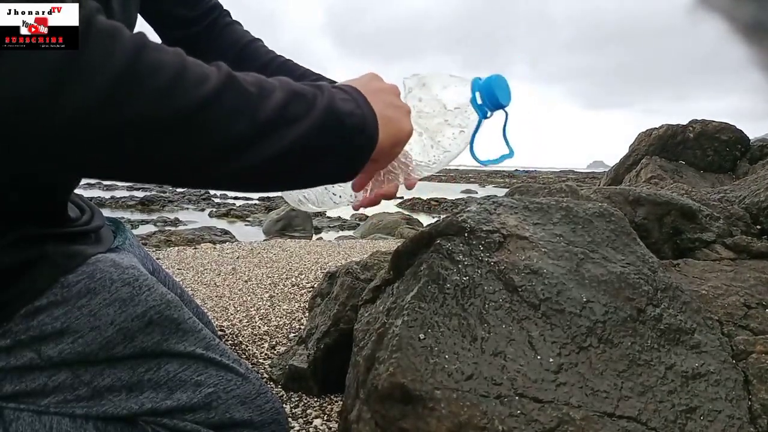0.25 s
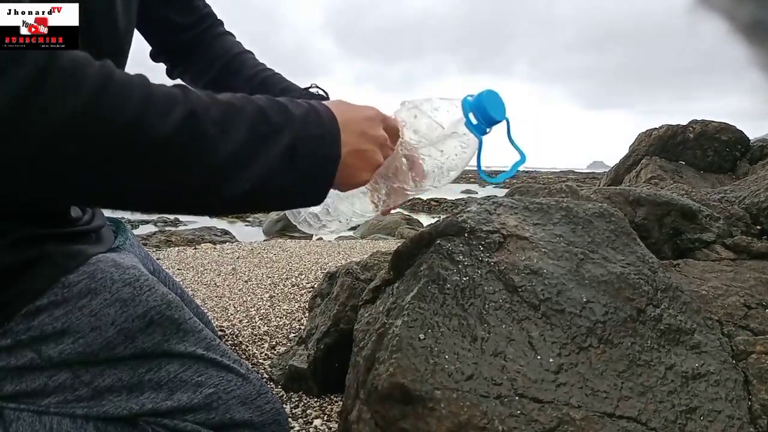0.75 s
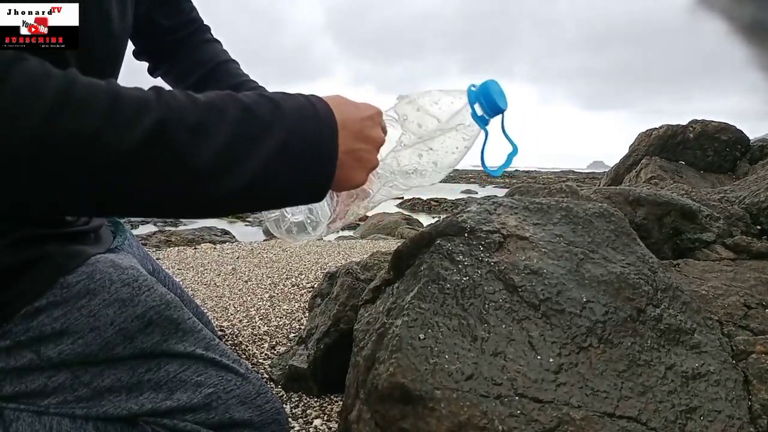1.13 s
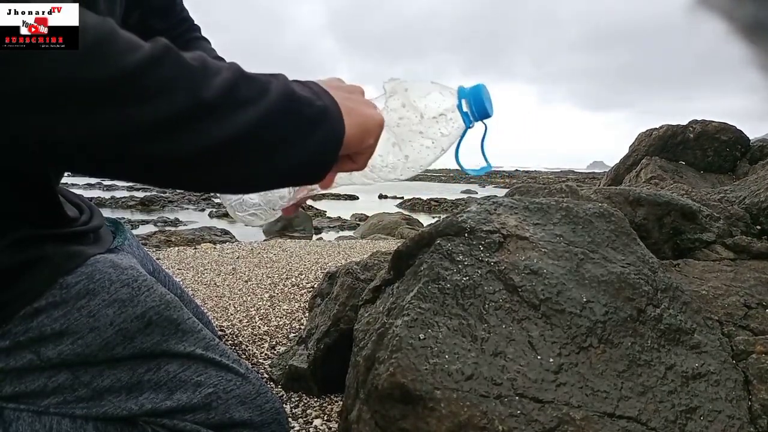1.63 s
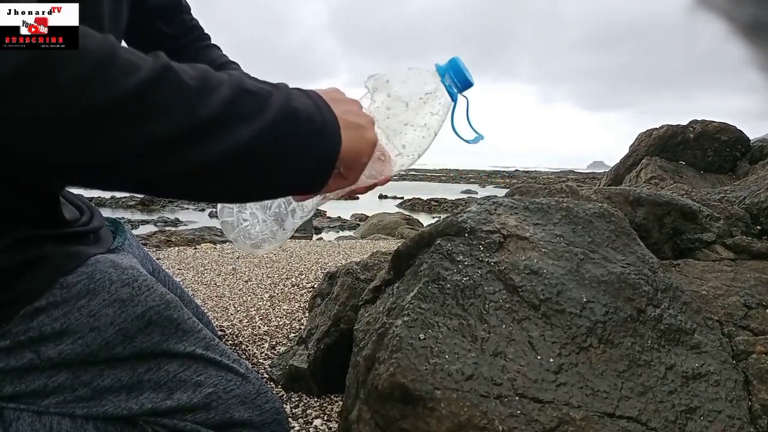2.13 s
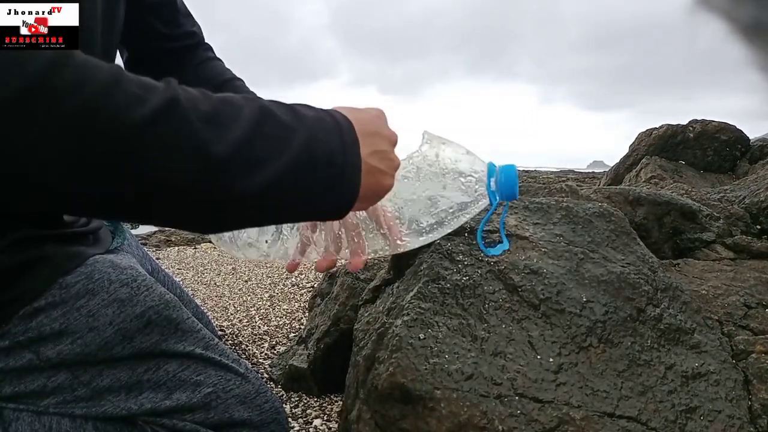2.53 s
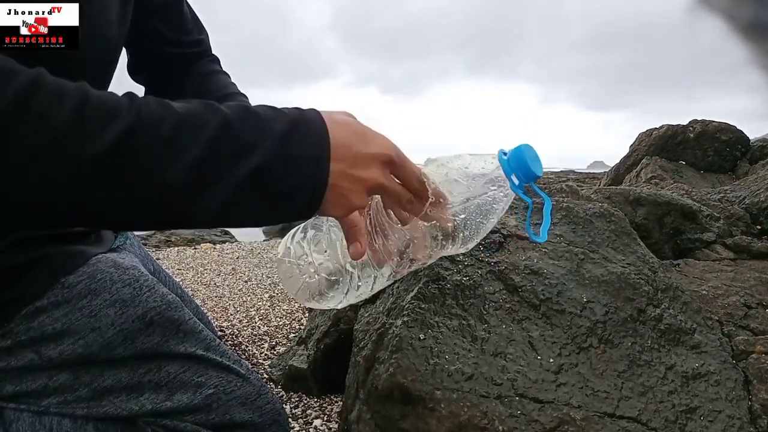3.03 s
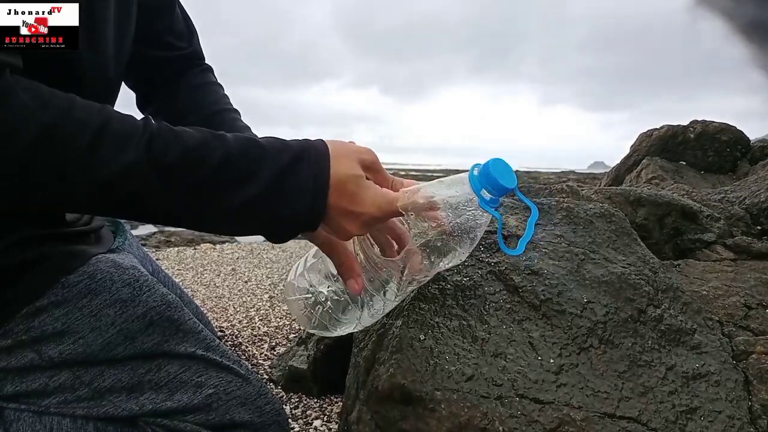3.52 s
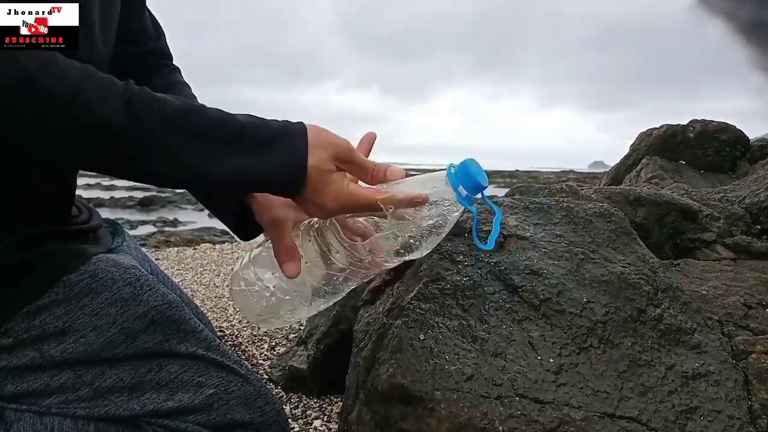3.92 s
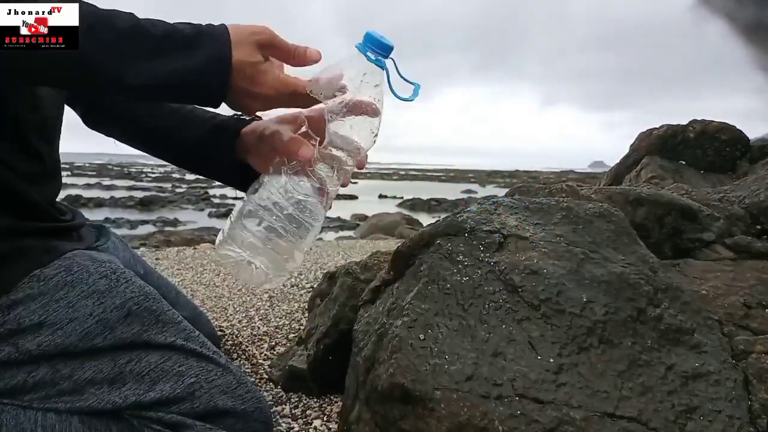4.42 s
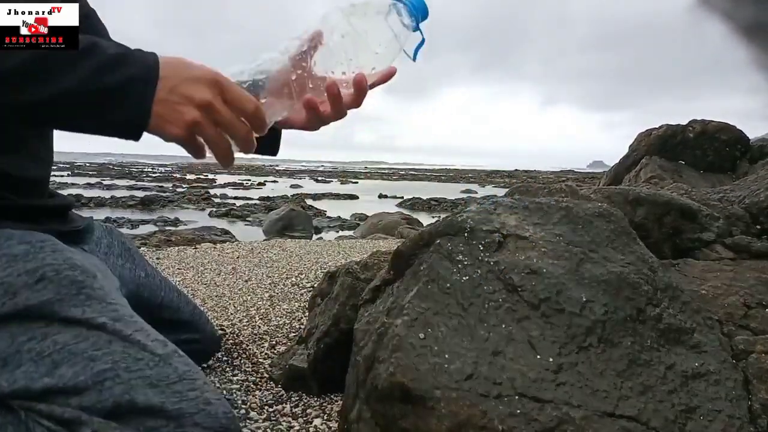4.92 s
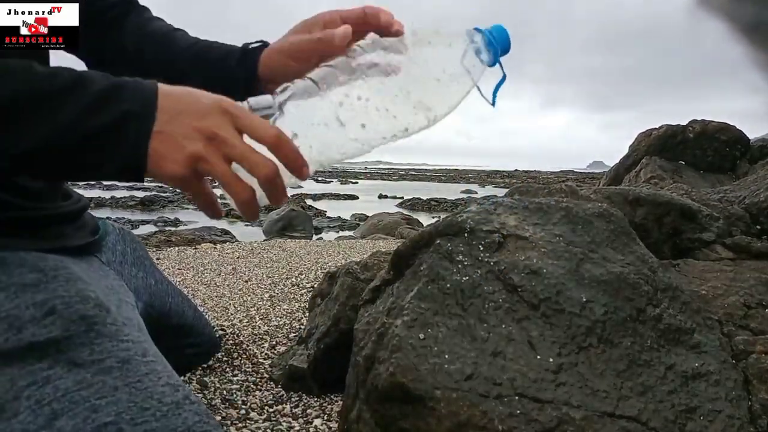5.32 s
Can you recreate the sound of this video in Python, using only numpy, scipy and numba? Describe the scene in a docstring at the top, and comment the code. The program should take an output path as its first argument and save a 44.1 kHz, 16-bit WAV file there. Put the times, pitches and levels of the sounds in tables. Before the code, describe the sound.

An empty plastic bottle is squeezed and twisted close to the microphone on an open rocky shore. From the start, small bright clicks and snaps come in irregular groups, with a tight cluster near 0.5 s and strong pops around 0.9 s. Lighter ticks follow at 1.2 s, then a hard double crack near 1.8 s. Crackling thickens from 2.2 s into the loudest burst at about 2.5 s, briefly pushing the background down. From 2.8 to 3.5 s it is sparser, with soft skin rubs and a barely audible squeak. A solid pop lands at 3.65 s, hollow low booms swell around 3.85 to 4.1 s, and a loud snap hits near 4.4 s. A short rub and squeak at 4.65 s leads to a lull, then boomy pops, scrapes and crackles from 5.05 s to the end. Gusting low wind and faint distant surf continue throughout.

```python
"""Sharp plastic snaps, rubs and hollow booms: two hands squeeze and twist an empty bottle on a rocky shore.
Dents in the thin wall buckle, ringing ribs and panels and pumping the air inside; skin sticks and slips.
Gusting wind rumbles and rushes over the hiss of far surf, and the rocks scatter a faint answer.
A limiter ducks everything during the hardest snaps and for a moment after them."""
import sys
import numpy as np
from scipy import signal
from scipy.fft import rfft, irfft, next_fast_len
from scipy.io import wavfile
from scipy.ndimage import uniform_filter1d, minimum_filter1d, map_coordinates
from numba import njit

SR = 44100
rng = np.random.default_rng(int(sys.argv[2]) if len(sys.argv) > 2 else 0)


def store_pcm(level_fs):
    """Save levels as 16-bit WAV."""
    pcm = np.round(np.clip(level_fs, -1, 1) * 32767).astype(np.int16)
    wavfile.write(sys.argv[1], SR, np.atleast_2d(pcm).T)


N = 245195  # length in samples

# colour of the thin hiss, in skin friction and in the faint background: frequency_hz, relative_level_db
HISS_COLOUR = [(3000, -16), (5000, -1.5), (6500, -9), (8100, 3.5), (10000, -14), (13000, -13), (15200, -5)]


def amp(db):
    """Level law: decibels to amplitude gain."""
    return 10 ** (np.asarray(db) / 20)


def unit(x):
    """Power normalisation: scale to rms 1."""
    return x / np.sqrt(np.mean(x ** 2) + 1e-20)


def unit_energy(x):
    """Energy normalisation: give each row the energy of 10 ms at rms 1."""
    energy = np.sum(x ** 2, -1, keepdims=True) / (SR * .01)
    return x / np.sqrt(energy + 1e-20)


def along(points, hz):
    """Interpolation of (frequency_hz, value) points along a logarithmic frequency axis."""
    f, v = np.transpose(points)
    return np.interp(np.log(hz + 1), np.log(f), v)


def colour(x, points):
    """Minimum-phase filtering: the log magnitude, folded in the cepstrum, fixes a causal response."""
    n = x.shape[-1]
    m = 2 * next_fast_len(n // 2 + 1024)
    # fall to -80 dB an octave outside the given points
    closed = [(points[0][0] / 2, -80), *points, (points[-1][0] * 2, -80)]
    log_gain = np.log(amp(along(closed, np.fft.rfftfreq(m, 1 / SR))))
    cepstrum = irfft(log_gain)
    cepstrum[1:m // 2] *= 2
    cepstrum[m // 2 + 1:] = 0
    response = np.exp(rfft(cepstrum))
    return irfft(rfft(x, m) * response, m)[..., :n]


def wobble(rate):
    """Slow random modulation: a smooth curve through normal deviates, rate knots a second."""
    knots = rng.standard_normal(int(N * rate / SR) + 4)
    return map_coordinates(knots, [np.arange(N) * rate / SR])


def noise(points):
    """Broadband excitation: coloured noise of rms 1."""
    return unit(colour(rng.standard_normal(N), points))


def tone(hz, waver, rate):
    """Frequency modulation: a sine of rms 1 whose pitch wanders by the relative depth waver."""
    pitch_hz = hz * (1 + waver * wobble(rate))
    return unit(np.sin(2 * np.pi * np.cumsum(pitch_hz) / SR))


def swell(middle, half_width):
    """Gaussian envelope, down to exp(-2) of its peak at half_width seconds from the middle."""
    return np.exp(-2 * ((np.arange(N) / SR - middle) / half_width) ** 2)


def dying(t, t60, attack):
    """Damped response: quick rise, then exponential decay by 60 dB in t60 seconds."""
    return amp(-60 * t / t60) * (1 - np.exp(-t / attack))


def wind():
    """Turbulence: a low rumble follows the wind strength fully, a higher rush only in part."""
    # wind strength, of which only the departure from its mean counts: time_s, strength_db
    gusts = [(0, -32), (0.6, -36), (1.0, -33), (1.8, -35.5), (2.2, -34), (2.4, -39), (2.9, -29.5),
             (3.2, -33.5), (3.45, -30.5), (4.0, -30.5), (4.2, -36.5), (4.55, -29.5), (5.2, -37.5),
             (5.4, -30.5), (5.56, -37)]
    # colours of the rumble and the rush: frequency_hz, relative_level_db
    rumble_colour = [(20, -42), (33, -33), (50, -8), (75, -2), (130, 2.5), (200, -2), (280, -11),
                     (450, -28.5)]
    rush_colour = [(120, -16.5), (230, 4), (350, 0), (500, -4.5), (700, -10), (1000, -22), (1600, -32)]
    rumble_db, rush_db, rush_follows = -33.7, -33.8, 0.3  # base levels; rush dB per gust dB
    strength_db = np.interp(np.arange(N) / SR, *np.transpose(gusts))
    gust_db = strength_db - strength_db.mean()
    rumble = amp(rumble_db + gust_db + 2.9 * wobble(26)) * noise(rumble_colour)
    rush = amp(rush_db + rush_follows * gust_db + 1.3 * wobble(16)) * noise(rush_colour)
    return rumble + rush


def surf():
    """Many distant sources merge into smooth noise, over a much fainter steady hiss."""
    # colour of far surf: frequency_hz, relative_level_db
    surf_colour = [(400, -15.5), (900, 7), (1500, 1.5), (2200, -0.5), (3300, -2), (4200, -9.5),
                   (5200, -21.5), (6500, -26.5), (8200, -24), (10000, -35), (15000, -40)]
    waves = amp(-49.5 + 0.14 * wobble(2.1)) * noise(surf_colour)
    return waves + amp(-75) * noise(HISS_COLOUR)


def rocks(x):
    """Diffuse scattering: boulders and pebbles answer 3 ms later with a short decaying noise tail."""
    # decay time of the scattered sound: frequency_hz, t60_s
    decay = [(200, 0.051), (2000, 0.047), (8000, 0.043), (15000, 0.042)]
    hz, t, z = signal.stft(rng.standard_normal(SR // 5), SR, nperseg=128)
    fading = z * amp(-60 * t / along(decay, hz)[:, None])
    tail = signal.istft(fading, SR, nperseg=128)[1]
    delay = np.zeros(round(.003 * SR))
    return signal.fftconvolve(x, np.concatenate([delay, tail / np.linalg.norm(tail)]))[:N]


def squeaks():
    """Stick-slip oscillation: skin on the wall locks briefly into a faint, thin, unsteady tone."""
    # middle_s, pitch_hz, level_db
    chirps = [(3.262, 1750, -40), (4.665, 1380, -33)]
    return sum(amp(db) * swell(s, 0.016) * tone(hz, waver=0.07, rate=450) for s, hz, db in chirps)


def slides():
    """Stick-slip friction: an irregular grip modulates the scrape and hiss of skin on the wall."""
    # fingers sliding: middle_s, half_width_s, scrape_level_db
    strokes = [(0.283, 0.089, -50.5), (1.06, 0.045, -47), (3.135, 0.08, -51), (3.305, 0.03, -45.5),
               (3.835, 0.047, -42), (4.027, .08, -52), (4.672, 0.038, -35), (4.88, 0.53, -53.5),
               (5.29, 0.025, -35), (5.348, 0.062, -35), (5.507, 0.058, -48)]
    # colour of the scrape: frequency_hz, relative_level_db
    scrape_colour = [(600, -7), (1000, -0.5), (1500, 3.5), (2300, -4.5), (3100, -2), (4500, -16.5),
                     (7000, -36)]
    hiss_db, hiss_grows = -31, 0.66  # the hiss gains less than a dB per dB of scrape
    scrape = sum(amp(db) * swell(s, width) for s, width, db in strokes)
    hiss = sum(amp(hiss_db + hiss_grows * db) * swell(s, width) for s, width, db in strokes)
    grip = unit(amp(4.2 * wobble(500) + 1.5 * wobble(90)))
    return grip * (scrape * noise(scrape_colour) + hiss * noise(HISS_COLOUR))


def booms():
    """Cavity resonance: the hollow bottle booms briefly, as the grip shifts or after a snap."""
    # middle_s, pitch_hz, level_db
    hollow_booms = [(2.832, 112, -26), (3.842, 156, -15), (3.896, 127, -23), (3.95, 55, -31),
                    (3.94, 119, -26), (3.983, 174, -22.5), (3.988, 94, -21.5), (4.076, 149, -23),
                    (4.138, 570, -23.5), (4.63, 125, -24.5), (5.058, 202, -24), (5.113, 228, -21)]
    return sum(amp(db) * swell(s, 0.021) * tone(hz, waver=0.062, rate=60) for s, hz, db in hollow_booms)


def dents():
    """Stress redistribution: some dents make a neighbouring crease give way, weaker and duller."""
    # buckling dents; sharp_db sets the crack and air_db the thump, both relative to the panel:
    # start_s, level_db, panel_hz, sharp_db, air_db, thump_hz
    main = np.array([(0.0439, -20, 1740, -4, -22, 300), (0.0758, -25, 1390, -33, 1, 363),
                     (0.1572, -14, 1460, -21, -16, 610), (0.4369, -24, 1860, -20, -3, 375),
                     (0.444, -19, 1760, -7, -11, 850), (0.4881, -25, 1510, -28, -9, 380),
                     (0.503, -27, 2130, -19, -5, 400), (0.5082, -12, 1880, -9, -3, 437),
                     (0.5197, -21, 1460, -30, -18, 413), (0.5758, -27, 1100, -7, -1, 670),
                     (0.5851, -15, 2010, -2, 0, 365), (0.652, -19, 1650, -13, -22, 320),
                     (0.8707, -12, 1457, -9, -5, 587), (0.9232, -12, 2210, -9, -6, 440),
                     (0.9368, -16, 1930, -25, -22, 600), (0.9743, -29, 910, -35, 12, 430),
                     (1.1796, -25, 1600, -34, 0, 368), (1.1896, -27, 1700, -30, -6, 310),
                     (1.2451, -26, 1920, -8, 3, 496), (1.2517, -19, 1090, -11, 0, 287),
                     (1.2669, -20, 2170, -5, 4, 322), (1.3043, -32, 1340, -20, 4, 296),
                     (1.3406, -30, 980, -26, 3, 294), (1.6988, -15, 2110, -13, -7, 610),
                     (1.7437, -29, 1240, -40, -12, 400), (1.7672, -8, 1840, -14, -15, 430),
                     (1.7805, -10, 1230, -16, 0, 340), (1.9317, -16, 1720, -12, -8, 404),
                     (1.9914, -17, 1470, -28, -2, 386), (2.0597, -23, 1260, -37, 2, 520),
                     (2.0705, -31, 1070, -39, 9, 394), (2.2207, -23, 2010, -7, -5, 340),
                     (2.2598, -25, 1730, -32, 0, 386), (2.289, -20, 1960, -16, -1, 377),
                     (2.3085, -13, 2110, -10, -1, 417), (2.3292, -24, 1660, -35, 1, 300),
                     (2.3405, -15, 2100, -29, -2, 379), (2.3506, -23, 1590, -31, 3, 516),
                     (2.3761, -13, 2010, -24, -3, 397), (2.4713, -24, 1870, -14, -5, 333),
                     (2.4792, -19, 910, -2, 6, 312), (2.4857, -15, 1870, -16, -12, 297),
                     (2.4909, -3, 1480, -13, -2, 420), (2.4993, -9, 2170, -17, -3, 444),
                     (2.5094, -13, 1590, -26, -2, 416), (2.5307, -7, 1580, -26, -9, 390),
                     (2.6746, -16, 1250, -11, 2, 400), (2.846, -41, 1980, -2, -15, 300),
                     (2.8528, -20, 1770, -26, -12, 303), (2.8628, -21, 1465, -38, -20, 650),
                     (2.8987, -21, 1600, -35, -8, 664), (2.927, -16, 1616, -15, -12, 415),
                     (2.9674, -27, 1940, -12, -2, 398), (2.992, -29, 1010, -3, 6, 370),
                     (3.0647, -33, 1360, -25, 7, 337), (3.1323, -32, 1890, -34, 6, 420),
                     (3.534, -19, 1064, -38, 0, 718), (3.5963, -19, 1830, -17, -2, 412),
                     (3.6629, -9, 1555, -13, 6, 363), (3.8934, -18, 2000, -21, 0, 440),
                     (3.9046, -22, 1620, -28, 5, 370), (4.0752, -17, 1930, -30, 0, 412),
                     (4.1166, -17, 1690, -21, -17, 820), (4.123, -12, 1205, -10, 3, 568),
                     (4.3691, -5, 1350, -12, 0, 520), (4.4394, -17, 1950, -10, -8, 370),
                     (4.4486, -21, 944, -20, 9, 444), (4.4765, -26, 2170, -25, -2, 440),
                     (4.4824, -14, 1770, -12, 10, 365), (4.5469, -17, 1610, -3, -5, 608),
                     (4.5782, -29, 1013, -33, 11, 396), (5.0536, -15, 1600, -31, -2, 295),
                     (5.1026, -13, 1400, -11, 5, 300), (5.1427, -28, 1840, -8, 2, 432),
                     (5.1761, -17, 1590, -7, -17, 300), (5.1946, -22, 2080, -10, -7, 290),
                     (5.3079, -18, 1500, -12, -4, 840), (5.3453, -29, 940, 8, 3, 310),
                     (5.3632, -14, 1030, -7, -1, 388), (5.4067, -14, 1620, -30, -10, 335)])
    settle_chance, settle_db, settle_dull_db = 0.15, -21, -12
    luck, wait, size = rng.random((len(main), 3)).T
    s, db, panel_hz, sharp_db, air_db, thump_hz = main.T
    later_s = s + 0.004 + wait * 0.006  # 4 to 10 ms later
    lower_hz = panel_hz * 2 ** ((size - 1) / 2)  # up to half an octave lower
    after = np.transpose([later_s, db + settle_db, lower_hz,
                          sharp_db + settle_dull_db, air_db + settle_dull_db, thump_hz])
    return np.vstack([main, after[luck < settle_chance]])


def ring(t, hz, t60, zone, share, stretch, attack):
    """Modal response: one leading mode with a share of the energy, among a noisy crowd of neighbours."""
    share = np.clip(share, 0, 1)
    sign = rng.choice([-1, 1], hz.shape)
    sine = sign * np.sin(2 * np.pi * hz * t)
    mode = unit_energy(colour(sine * dying(t, t60 * stretch, attack), zone))
    crowd = rng.standard_normal(mode.shape) * dying(t, t60, attack)
    crowd = unit_energy(colour(crowd, zone))
    return unit_energy(np.sqrt(share) * mode + np.sqrt(1 - share) * crowd)


def snaps():
    """Snap-through buckling: the crease cracks, ribs and panels ring briefly, the enclosed air thumps."""
    # colours of the air, flat panels, ribs, crease and the crease's finest edge:
    # frequency_hz, relative_level_db
    hollow_colour = [(50, -28), (120, -2), (250, -1.5), (420, 2), (650, -0.5), (950, -3.5), (1600, -18)]
    panel_colour = [(400, -27.5), (850, -7), (1400, 2.5), (2000, 1.5), (2400, -8), (3800, -31)]
    rib_colour = [(1400, -47), (2200, -1), (3100, 3.5), (3900, -0.5), (4700, -12), (6000, -31),
                  (9000, -48.5)]
    crack_colour = [(3000, 3), (5000, 5.5), (6500, -1), (8200, 4.5), (9200, -4), (10500, -29), (15200, -25)]
    edge_colour = [(7000, -21), (9800, -3), (11500, -4), (13500, -1.5), (15200, 2)]
    # base level of the finest edge relative to the crack: time_s, level_db
    edge_course = [(0, -22), (0.45, -21), (0.5, -14), (0.9, -13), (1.25, -8), (3.0, -10), (4.4, -13),
                   (5.17, -23), (5.2, -12)]
    wall_t60_s, t60_s_per_db = 0.019, 0.00022  # ring at sharpness 0 dB; duller dents ring longer
    thump_t60_s, vent_s_per_db, longest_s = 0.014, 0.0021, 0.06  # hard thumps vent fastest
    mean_rib_hz, rib_scatter = 2950, 0.1  # scatter in log frequency
    rib_db, rib_follows = 3.6, 0.36  # rib level at sharpness 0 dB, and dB per dB of sharpness
    edge_from_db, edge_grows = -16, 0.6  # stronger snaps gain edge, dB per dB
    dull_from_db, dull_loss = -14, 0.8  # duller snaps lose it, dB per dB

    s, db, panel_hz, sharp_db, air_db, thump_hz = dents().T[:, :, None]
    t = np.arange(4096) / SR
    t60 = np.maximum(wall_t60_s - t60_s_per_db * sharp_db, .005)
    thump_t60 = np.clip(thump_t60_s - vent_s_per_db * (db + air_db), .005, longest_s)
    rib_hz = mean_rib_hz * np.exp(rib_scatter * rng.standard_normal(s.shape))

    thump = ring(t, thump_hz, thump_t60, hollow_colour, share=0.62, stretch=0.83, attack=0.00037)
    panel = ring(t, panel_hz, t60, panel_colour, share=0.57, stretch=0.89, attack=0.00019)
    rib = ring(t, rib_hz, t60 * 0.81, rib_colour, share=0.33, stretch=0.89, attack=0.00014)

    # the crease gives way within a millisecond, then its shiver dies in the wall
    shiver = dying(t, t60 * 1.13, attack=.0001) + 0.49 * dying(t, 0.0068, attack=.0001)
    burst = rng.standard_normal(rib.shape) * shiver
    edge_db = np.interp(s, *np.transpose(edge_course))
    edge_db = edge_db + edge_grows * np.maximum(db - edge_from_db, 0)
    edge_db = edge_db - dull_loss * np.maximum(dull_from_db - sharp_db, 0)
    edge = amp(edge_db) * unit_energy(colour(burst, edge_colour))
    crack = unit_energy(colour(burst, crack_colour)) + edge

    snap = amp(air_db) * thump + amp(-0.5) * panel
    snap = snap + amp(rib_db + rib_follows * sharp_db) * rib + amp(sharp_db) * crack
    # add every snap into the scene at its start
    where = np.round(s * SR).astype(int) + np.arange(len(t))
    return np.bincount(where.ravel(), (amp(db) * snap).ravel(), N)[:N]


def scene():
    """Superposition: the bottle, its answer from the rocks, wind and surf."""
    bottle = snaps() + slides() + booms() + squeaks()
    return (bottle + amp(-23.5) * rocks(bottle) + wind() + surf())[None]


@njit
def recover(cut, keep):
    """Peak following: take every rise of the cut at once and let go exponentially."""
    out = cut.copy()
    for i in range(1, len(out)):
        out[i] = max(cut[i], out[i - 1] * keep)
    return out


def limiter(x, ceiling_db, hold, release):
    """Look-ahead gain control: turn down just before each peak, hold, then come back (seconds)."""
    power = uniform_filter1d(x ** 2, size=44)  # averaged over 1 ms
    level_db = 10 * np.log10(np.abs(power) + 1e-12)
    span = 2 * int(hold * SR / 2) + 1
    # the window reaches 60 samples ahead and the rest of the hold back
    cut = -minimum_filter1d(np.minimum(ceiling_db - level_db, 0), span, origin=span // 2 - 60)
    cut_db = recover(cut, np.exp(-1 / (release * SR)))
    return x * amp(-uniform_filter1d(cut_db, size=60))


def record(dry):
    """Limiting, soft saturation of the last peaks, then a steep zero-phase low-pass."""
    top_hz = 15600
    x = limiter(dry[0], ceiling_db=-7.5, hold=0.032, release=0.063)
    x = x / (1 + np.abs(x / .95) ** 6) ** (1 / 6)
    m = next_fast_len(N + SR // 2)
    low_pass = 1 / np.sqrt(1 + (np.fft.rfftfreq(m, 1 / SR) / top_hz) ** 120)
    return irfft(rfft(x, m) * low_pass, m)[None, :N]


dry = scene()
out = record(dry)
store_pcm(out)
```